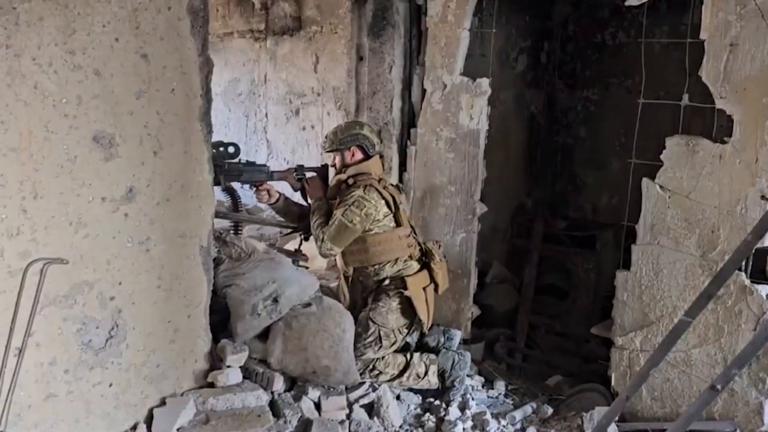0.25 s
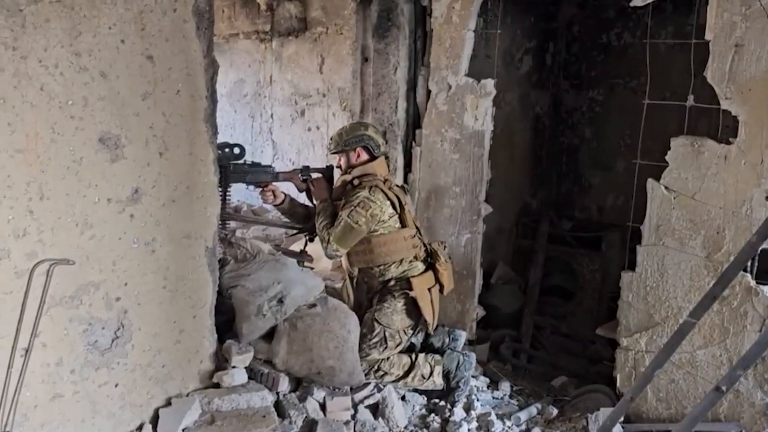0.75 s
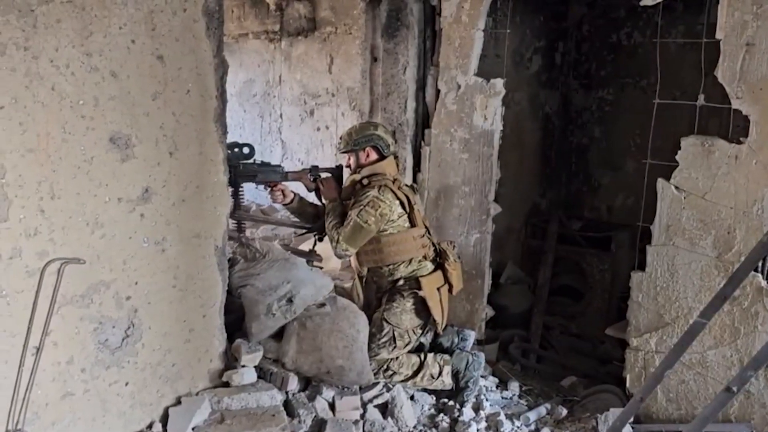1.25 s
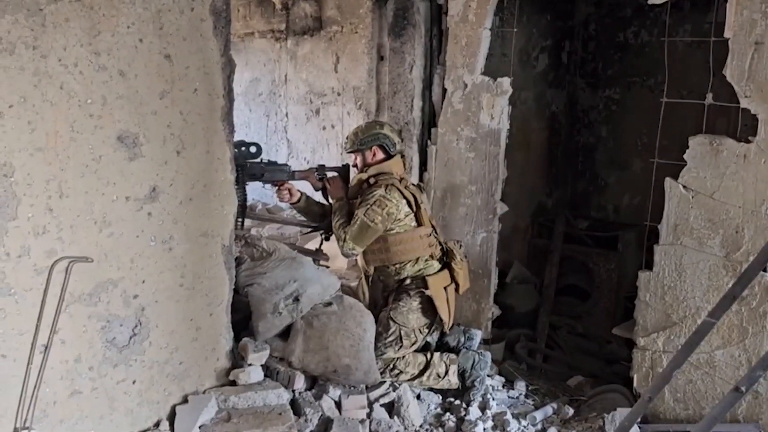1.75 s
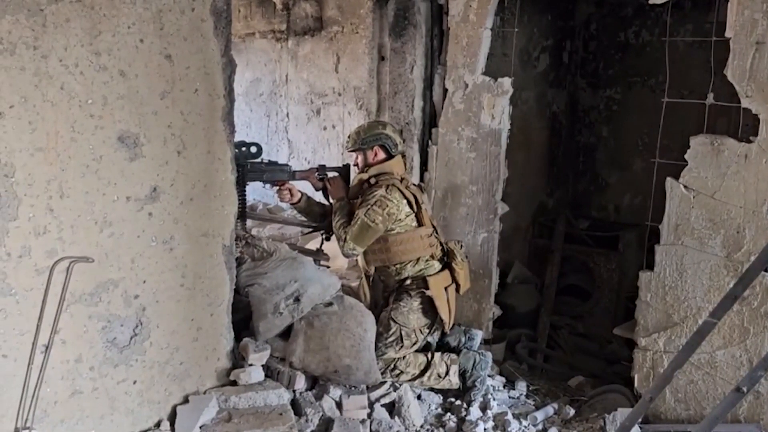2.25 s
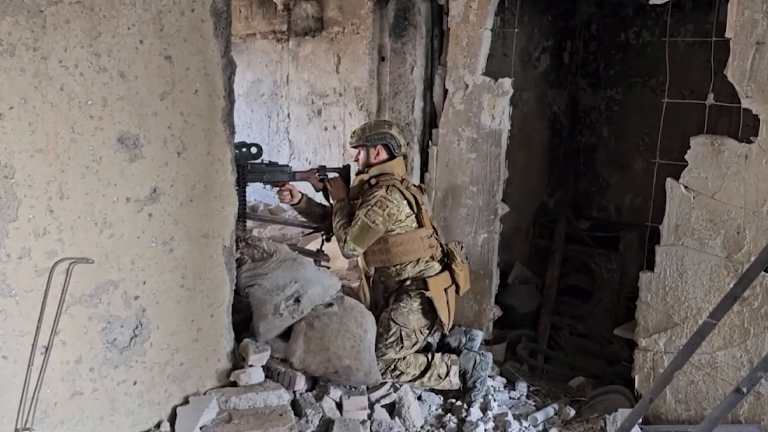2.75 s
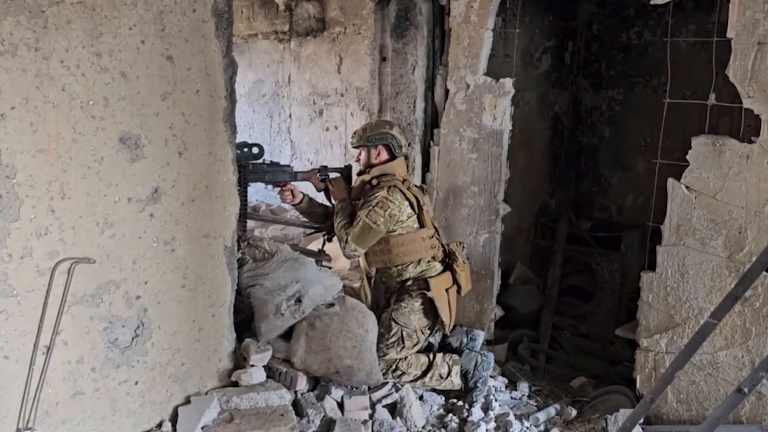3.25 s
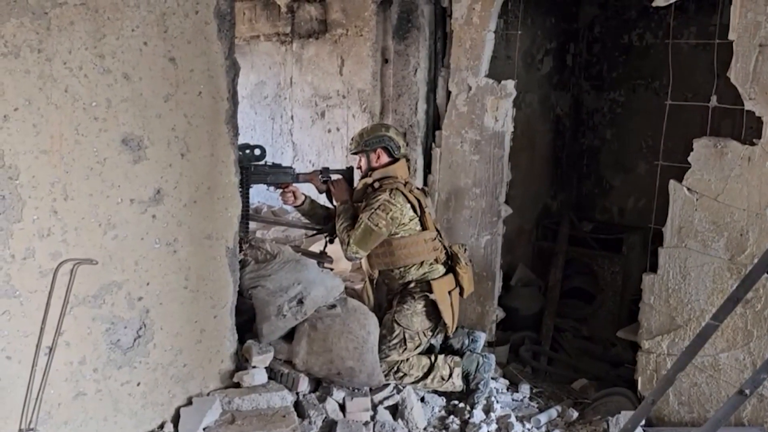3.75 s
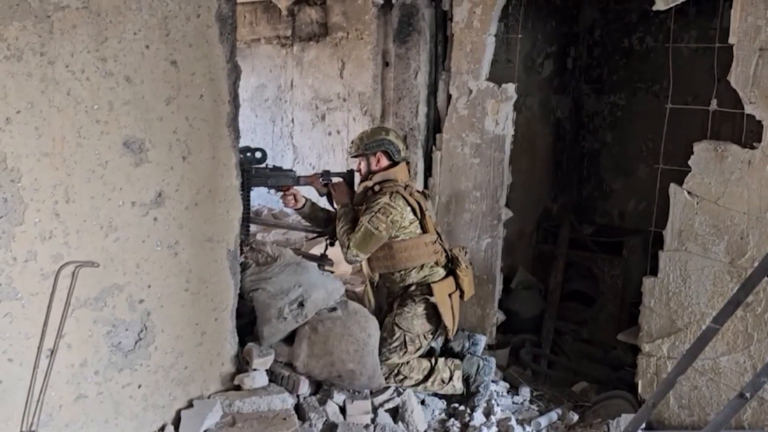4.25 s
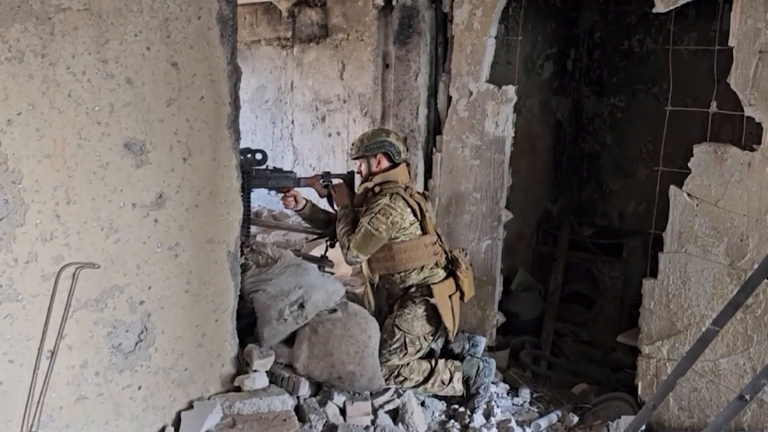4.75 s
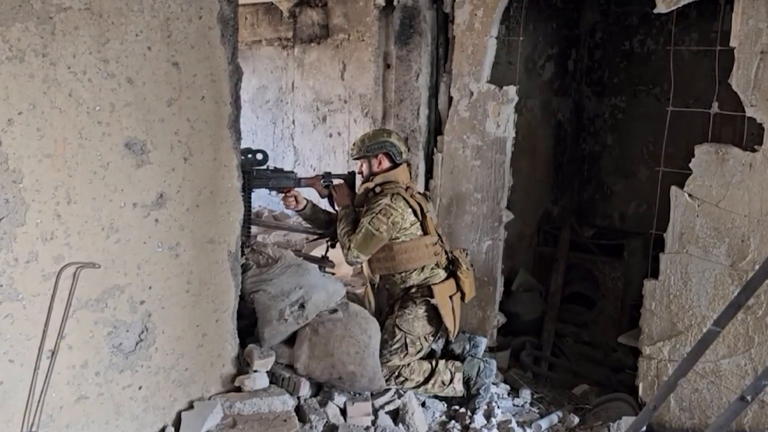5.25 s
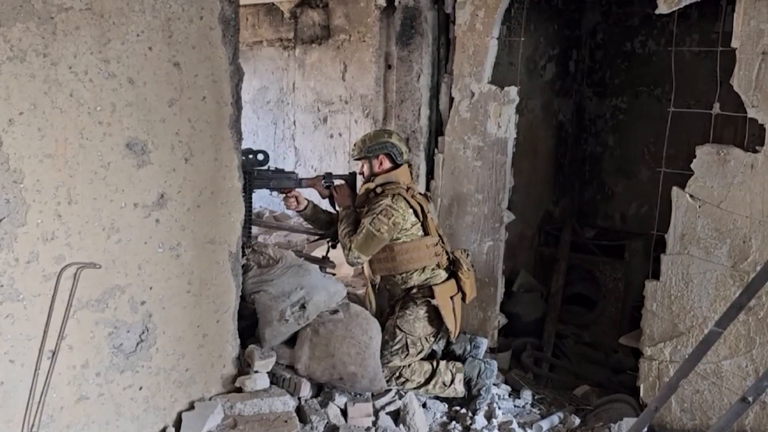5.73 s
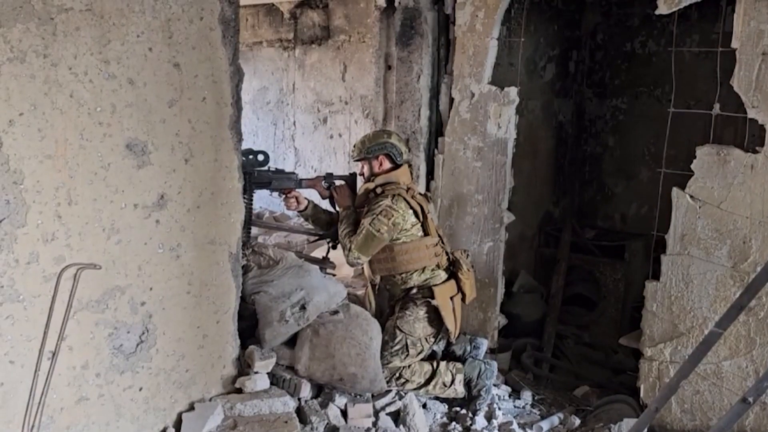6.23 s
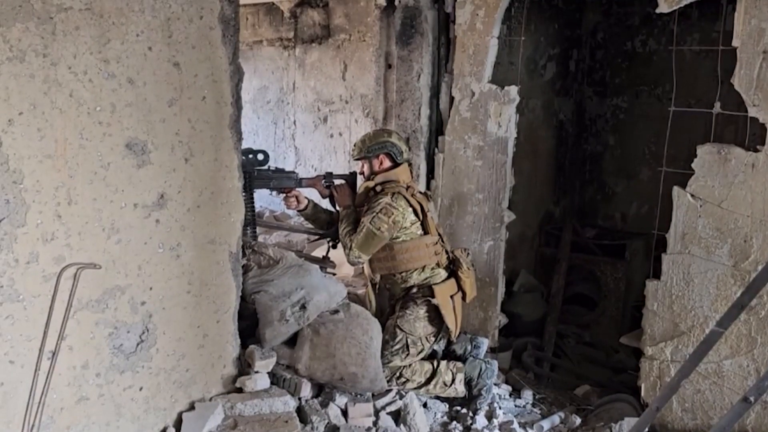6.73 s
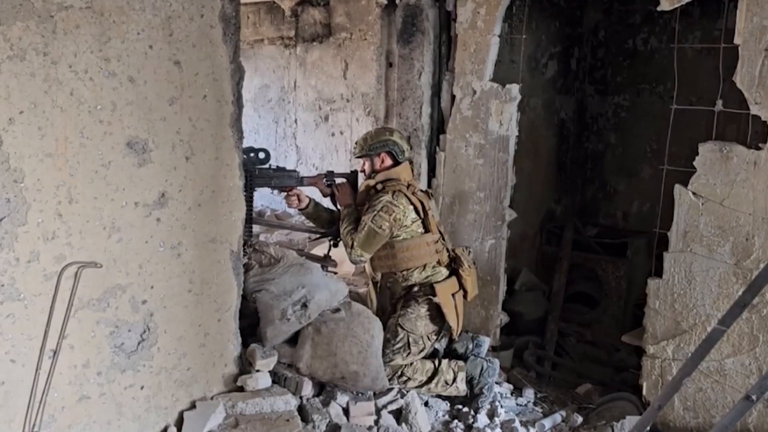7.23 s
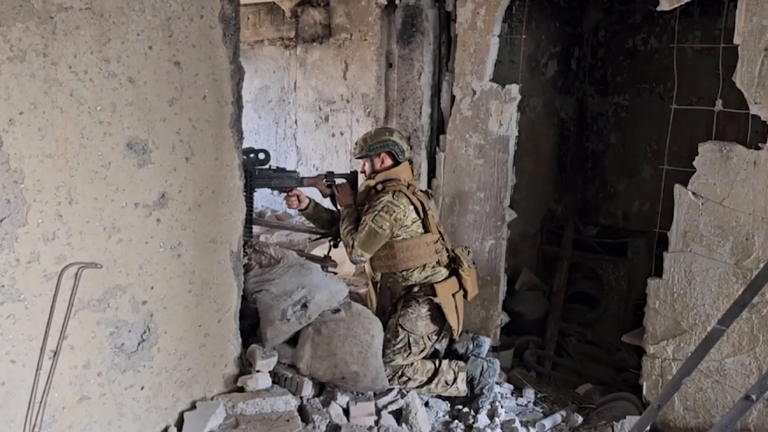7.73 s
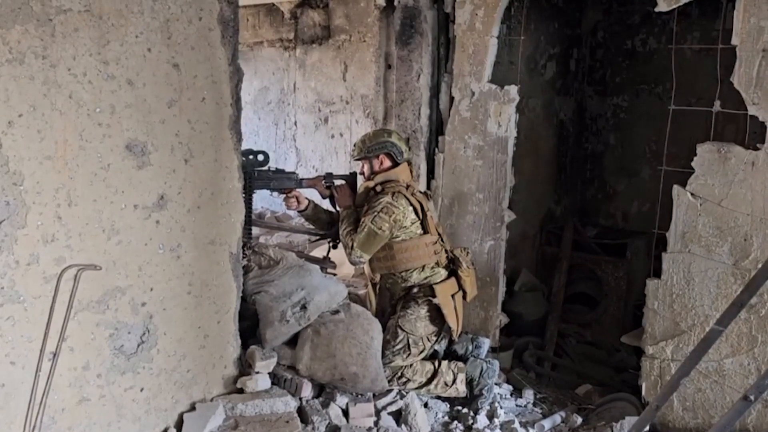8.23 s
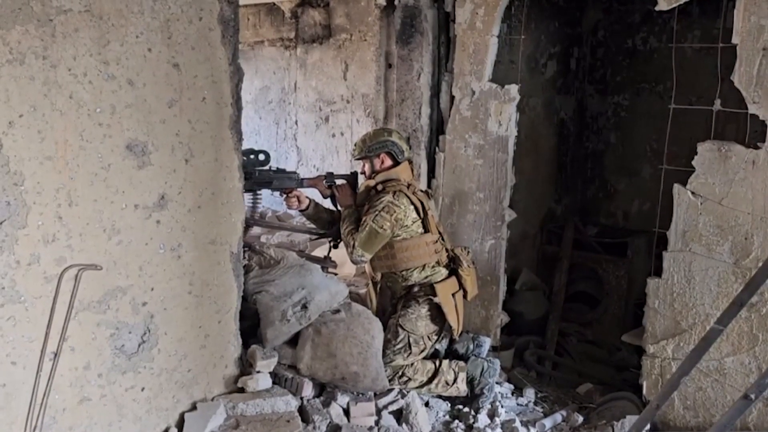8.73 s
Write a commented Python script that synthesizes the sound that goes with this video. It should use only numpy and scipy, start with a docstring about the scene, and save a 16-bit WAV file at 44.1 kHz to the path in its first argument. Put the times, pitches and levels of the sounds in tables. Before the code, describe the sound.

Close, overloaded gunfire in a ruined concrete room over faint low air noise. At 0.2 s a bolt scrapes forward and a machine gun fires five rounds until 0.6 s, the opening shot loudest. Sharp wall slaps and rumble follow; a case tinkles near 1.0 s. A ten-round burst runs from 1.2 to 2.0 s, ending in a low boom, with brass ticking on stone at 2.1-2.4 s. Distant cracks return around 3-5 s as the outdoor rumble fades; grit rustles at 3.4 s and a dull knock comes at 3.7 s. The bolt slides at 6.05 s, then eight rounds fire from 6.1 to 6.7 s. A faint low tone lingers from 7 s while cases and a belt link clink until 7.8 s. A soft thud sounds at 8.1 s, the bolt slides at 8.55 s, and five rounds fire from 8.6 to 9.0 s.

```python
"""Machine gun in a ruin

A machine gun fires four bursts inside a ruined building. Noise shaped by pitch makes the room's roar.
Low notes ring after each round; short falling tones come back from walls and slopes as sharp echoes.
Fading noise makes the rumble outdoors and the sliding bolt. Spent cases tick and ring on the rubble.
"""
import sys
import numpy as np
from scipy import signal
from scipy.fft import rfft, irfft
from scipy.io import wavfile
from scipy.ndimage import uniform_filter1d

SR = 44100
rng = np.random.default_rng(int(sys.argv[2]) if len(sys.argv) > 2 else 0)


def store_wav(level_fs):
    """Save 16-bit WAV to argv[1]."""
    pcm = np.round(np.clip(np.atleast_2d(level_fs), -1, 1) * 32767)
    wavfile.write(sys.argv[1], SR, pcm.T.astype(np.int16))


N = 396459  # length in samples


def gain_of(db):
    """Turn decibels into a factor for the wave."""
    return 10 ** (np.asarray(db) / 20)


def flat(db):
    """The same level at every pitch."""
    return lambda hz: db


def read(points, hz):
    """Read a table between its points, with pitch on a log scale."""
    f, value = np.transpose(points)
    return np.interp(np.log(hz + 1), np.log(f + 1), value)


def add(mix, s, sound):
    """Lay a sound into the mix at s seconds."""
    part = mix[:, round(s * SR):][:, :sound.shape[-1]]
    part += sound[..., :part.shape[1]]


def placed(sound, lead_ms, pan_db):
    """Two microphone ports hear one sound a little apart in time and level."""
    hz = np.fft.rfftfreq(len(sound), 1 / SR)
    side = np.array([[.5], [-.5]])
    shift = np.exp(2j * np.pi * hz * lead_ms / 1000 * side)
    return irfft(rfft(sound) * shift, len(sound)) * gain_of(pan_db * side)


# how alike left and right are: (f/Hz, likeness from 0 to 1)
LIKENESS = [(60, 1), (250, 0.14), (600, 0.94), (1200, 0.31), (2500, 0.057), (12000, 0.03)]


def diffuse(times, level_db, spectrum, t60, rise_s, lead_ms, pan_db, size):
    """Reverberant noise: each event feeds every band, which swells, then dies at its own speed."""
    hop, hz = size // 4, np.fft.rfftfreq(size, 1 / SR)
    frames = N // hop + 5
    shape = gain_of(read(spectrum, hz)) ** 2
    feed = np.zeros((len(hz), frames))
    for s, db in zip(times, level_db):
        if s * SR < N:
            feed[:, int(np.ceil(s * SR / hop))] += shape / shape.sum() * gain_of(2 * db(hz))
    # 120 dB here is 60 dB of sound level, because power is being faded
    fall = gain_of(-120 * hop / SR / read(t60, hz))
    swell = np.exp(-hop / SR / rise_s)
    power = np.array([signal.lfilter([1], [1, -r], row) for r, row in zip(fall, feed)])
    power = signal.lfilter([1 - swell], [1, -swell], power)
    a, b, c, d, lumps = rng.standard_normal((frames, len(hz), 5), dtype=np.float32).T
    # random patches of pitch and time are louder or softer
    lumps = uniform_filter1d(uniform_filter1d(lumps, size=3, axis=0), size=12, axis=1)
    power *= gain_of(2 * 2.1 * lumps / lumps.std())
    same = np.clip(read(LIKENESS, hz), 0, 1)[:, None]
    left = a + 1j * b
    late = np.exp(-2j * np.pi * hz * lead_ms / 1000)[:, None]
    right = same * left * late + np.sqrt(1 - same ** 2) * (c + 1j * d)
    bands = np.array([left, right]) * np.sqrt(power)
    sound = signal.istft(bands, nperseg=size, noverlap=size - hop)[1][:, :N]
    return sound * gain_of([[pan_db / 2], [-pan_db / 2]]) / 2


# colour of the background air: (f/Hz, relative level/dB per Hz)
AIR_COLOUR = [(30, -22), (69, -19.5), (107, 1.5), (148, -33), (238, -16), (3500, -43), (4550, -78),
              (7700, -120)]
AIR_DB = -65.5


def air():
    """Steady, mostly low noise; its fade is so slow that it cannot be heard."""
    still = [(100, 1e4), (1000, 1e4)]
    return diffuse([0], [flat(AIR_DB)], AIR_COLOUR, still, 1e-4, 0, 1.1, size=1024)


HUM_S, HUM_HZ, HUM_DB = 6.96, 217, -45.5
HUM_RISE_S, HUM_T60_S = 0.045, 3.7


def hum():
    """A low tone hangs on after the third burst, its pitch wavering a little."""
    t = np.maximum(np.arange(N) / SR - HUM_S, 0)
    waver_hz = uniform_filter1d(rng.standard_normal(N), 4000) * 150
    level = np.minimum(t / HUM_RISE_S, 1) ** 2 * gain_of(HUM_DB - 60 * t / HUM_T60_S)
    return level * np.sin(2 * np.pi * np.cumsum(HUM_HZ + waver_hz) / SR)


# extra tones in a returning crack: (multiple of its pitch, level/dB)
CRACK_OVERTONES = [(2, -16), (3, -28)]
SMEAR_DB, SMEAR_S = -36, .025  # rough ground drags each echo out
SCATTER_DB, SCATTER_S = -19.5, 0.054  # rubble scatters the bright edge


def returning_crack(hz, tune, ms, edge_db, again_ms, noise):
    """A crack comes back as a few falling cycles, smeared, repeated and edged with noise."""
    t = np.arange(-128, 1920) / SR
    turns = hz * (1 + .03 * tune) * t * (1 - 110 * t)
    slap = np.sin(2 * np.pi * turns)
    slap += sum(gain_of(a) * np.sin(2 * np.pi * k * turns) for k, a in CRACK_OVERTONES)
    slap *= np.exp(-(t * 1000 / ms) ** 2)
    tail = noise * np.exp(-(t - t[0]) / SMEAR_S)
    slap += gain_of(SMEAR_DB) * signal.fftconvolve(slap, tail)[:len(t)]
    slap += gain_of(-15) * np.roll(slap, round(again_ms * SR / 1000))
    edge = np.exp(-(t * 1000 / ms / 2) ** 2)
    edge += gain_of(SCATTER_DB) * (t > 0) * np.exp(-t / SCATTER_S)
    return slap + gain_of(edge_db) * noise * edge  # near walls keep the bright edge


# walls and slopes that reflect: (delay t/s, base level/dB, centre f/Hz, length/ms,
# bright edge level/dB, second return after t/ms, left-right level/dB)
REFLECTORS = [(.319, -15, 2200, .35, -7, 7, 2), (.3455, -16, 2000, .45, -20, 7, 2),
              (2.753, -32.5, 1450, .9, -60, 15.5, 4)]
# colour of the rumble outside: (f/Hz, relative level/dB per Hz)
LAND_COLOUR = [(30, 4), (86, -8.5), (166, -23), (217, -10), (802, -14.5), (1100, -20.5), (2200, -18.5),
               (3600, -24), (6000, -35), (8450, -70.5), (14300, -120)]
# how long the rumble takes to fall 60 dB: (f/Hz, t/s)
LAND_FADE = [(60, 3.2), (250, 4.4), (2000, 3.6), (4000, 2.6), (8000, 1.6)]
# colour of the murmur behind the far echo: (f/Hz, relative level/dB per Hz)
RIDGE_COLOUR = [(59, -52), (100, -8), (768, -4.5), (1580, -1.5), (3020, -17), (6000, -31), (7800, -76),
                (13200, -120)]
OPENING_SHIFT_S = .004  # an opening round's echo is timed from slightly after its listed start


def outdoors():
    """Every round has the same charge: sharp echoes, a long rumble, and a murmur from the far slope."""
    times = np.transpose(GUN_ROUNDS)[0]
    out, slope = np.zeros((2, N)), np.zeros((2, N))
    shift = OPENING_SHIFT_S * (np.diff(times, prepend=-np.inf) > PAUSE_S)
    for delay, db, hz, ms, edge_db, again_ms, pan_db in REFLECTORS:
        for s, luck in zip(times + shift, rng.standard_normal((len(times), 2050))):
            spread, tune = luck[:2]
            slap = returning_crack(hz, tune, ms, edge_db, again_ms, luck[2:])
            echo = gain_of(db + .8 * spread) * placed(slap, -.4, pan_db)
            add(slope if delay > 1 else out, s + delay - 128 / SR, echo)
    rumble_db, murmur_db = [flat(-28)] * len(times), [flat(-59.5)] * len(times)
    out += diffuse(times, rumble_db, LAND_COLOUR, LAND_FADE, 0.11, -0.35, 1.5, size=1024)
    far_times, far_fade = times + REFLECTORS[2][0], [(300, 2.9), (3000, 2.76)]
    out += diffuse(far_times, murmur_db, RIDGE_COLOUR, far_fade, 0.0063, -0.25, 2.2, size=1024)
    return out, slope


SLOPE_LINGER = 1.5  # the far slope's echoes feel the slow cut more


def held_down(far, slope, near):
    """Gain control: loud gunfire turns distant sound down; part of the cut lets go only slowly."""
    # taking differences between samples makes the treble count more
    power = uniform_filter1d(np.diff(near, prepend=0)[0] ** 2, 2000)
    power_db = 10 * np.log10(abs(power) + 1e-12)
    over_db = np.maximum(power_db + 56.5, 0)
    keep = np.exp(-1 / (.9 * SR))  # 0.9 s memory
    lingering_db = signal.lfilter([1 - keep], [1, -keep], over_db)
    distant = far + slope / gain_of(SLOPE_LINGER * lingering_db)
    return distant / gain_of(0.98 * over_db + 0.69 * lingering_db)


# dull knocks near the microphone: (t/s, strength level/dB, f/Hz)
DULL_KNOCKS = [(3.711, -27, 124), (8.143, -30.5, 94)]


def thuds():
    """A soft push: a low tone that dies too fast to ring."""
    t, out = np.arange(2048) / SR, np.zeros((2, N))
    for s, db, hz in DULL_KNOCKS:
        add(out, s, gain_of(db - 60 * t / 0.0045) * np.sin(2 * np.pi * hz * t))
    return out


# bits of rubble that drop without a ring: (t/s, base level/dB)
RUBBLE_CHIPS = [(3.448, -53), (7.805, -65), (8.137, -73)]
CHIP_HZ, CHIP_T60_S = (3500, 8050), 0.069


def chips():
    """A short dry rustle of grit: a band of noise that dies quickly."""
    t, out = np.arange(4096) / SR, np.zeros((2, N))
    band = signal.butter(2, CHIP_HZ, "band", fs=SR, output="sos")
    for (s, db), luck in zip(RUBBLE_CHIPS, rng.standard_normal((len(RUBBLE_CHIPS), len(t)))):
        grit = signal.sosfilt(band, luck)
        level = gain_of(db - 60 * t / CHIP_T60_S) * np.minimum(t / 0.0015, 1)
        add(out, s, placed(level * grit, 0.137, 8.1))
    return out


LINK_S, LINK_HZ, LINK_DB, LINK_T60_S = 7.511, 4600, -48, .08


def link():
    """A belt link clinks: one short fading tone of steel."""
    t, out = np.arange(4096) / SR, np.zeros((2, N))
    clink = gain_of(LINK_DB - 60 * t / LINK_T60_S) * np.sin(2 * np.pi * LINK_HZ * t)
    add(out, LINK_S, placed(clink, 0.28, 4.4))
    return out


# spent cases land: (t/s, base level/dB)
CASE_LANDINGS = [(0.9773, -37), (2.137, -30), (2.2422, -40.5), (2.405, -50), (7.14, -56.5), (7.215, -35.5),
                 (7.327, -50), (7.383, -43), (7.4939, -49), (7.5602, -45), (7.77, -59.5)]
# ringing tones of a case: (base f/Hz, relative level/dB, time to fall 60 dB t/s)
BRASS_TONES = [(9920, -5, .2), (10230, -5, .14), (13560, -2, .15), (15000, -10, .12)]
RING_DB, TICK_DB, GRIT_DB = -13, -11, -25  # brass, stone and grit against the landing's base level
GRIT_T60_S, CASE_SPREAD = .2, .022  # cases differ a little in pitch


def cases():
    """A dry tick on stone, rattling grit and ringing brass; each case skips on twice, more softly."""
    t, out = np.arange(6144) / SR, np.zeros((2, N))
    draws = rng.standard_normal((len(CASE_LANDINGS), 3, len(BRASS_TONES) + 3 + len(t)))
    for (s, db), luck in zip(CASE_LANDINGS, draws):
        tune = 1 + CASE_SPREAD * luck[0, 2]
        for skip, draw in enumerate(luck):
            gap, pan = draw[:2]
            ring = np.zeros(len(t))
            for (hz, a, t60), uneven in zip(BRASS_TONES, draw[3:]):
                level = gain_of(a + RING_DB + 1.8 * uneven - 60 * t / t60)
                ring += level * np.sin(2 * np.pi * hz * tune * t)
            scrape = gain_of(TICK_DB - 7.4 * skip - 60 * t / 0.025)
            scrape += gain_of(GRIT_DB - 60 * t / GRIT_T60_S)
            tick = scrape * np.diff(draw[-len(t):], prepend=0)
            landing = np.roll(ring + tick, 20)
            add(out, s, gain_of(db) * placed(landing, 0.138, 6.5 + 4.3 * pan))
            s, db = s + 0.022 * (1 + abs(gap)), db - 9.0
    return out


# the bolt runs forward before a burst: (t/s, slide level/dB,
# base level/dB of the lower swell as it rams the round home)
BOLT_RUNS = [(0.18, -13.5, -3), (1.122, -33, -43), (6.046, -19.5, -14), (8.555, -23.5, -13)]
# colour of the sliding bolt: (f/Hz, relative level/dB per Hz)
SLIDE_COLOUR = [(120, -52.5), (200, -24), (997, -10.5), (4620, -10.5), (15000, -23.5)]
# the ram against the slide: (f/Hz, level/dB)
RAM_COLOUR = [(250, 6.5), (700, 12.5), (1500, -13.5), (3000, -39)]
RAM_S, SLIDE_STOP_S = 0.041, 0.069  # ram's delay after the slide; fade of both once the gun fires


def bolt():
    """Steel slides on steel and a lower swell grows, until the first round goes off."""
    times, slide, ram = np.transpose(BOLT_RUNS)
    t, shots = np.arange(N) / SR, np.transpose(GUN_ROUNDS)[0]
    fired = shots[np.searchsorted(shots, times)]
    since = t - fired[np.maximum(np.searchsorted(times, t) - 1, 0)]
    colours = [flat(db) for db in slide]
    colours += [lambda hz, db=db: db + read(RAM_COLOUR, hz) for db in ram]
    starts, fade = [*times, *(times + RAM_S)], [(500, 0.91), (8000, 1.0)]
    out = diffuse(starts, colours, SLIDE_COLOUR, fade, 0.058, 0.53, 1.0, size=256)
    return out * np.exp(-np.maximum(since, 0) / SLIDE_STOP_S)


def blast(ms):
    """Muzzle blast round a corner: a rounded pressure step that swings through into suction."""
    u = np.maximum(np.arange(-40, 2008) / SR * 1000 / ms, 0)
    return (1 - u) * np.exp(-u) * (1 - np.exp(-3.5 * u)) * 2


def push(ms):
    """A dull swing from suction into pressure, centred 400 samples in."""
    u = np.arange(-400, 624) / SR * 1000 / ms
    return 2 * u * np.exp(-u ** 2)


def swing(hz, glide, swell_s, fade_s, turn):
    """A low note that swells and fades; its pitch can glide."""
    t = np.arange(8192) / SR
    turns = hz * t + glide * t * np.minimum(t, .06) / 2 + turn
    return np.sin(2 * np.pi * turns) * (t / swell_s) * np.exp(1 - t / fade_s)


SAG_HZ, SAG_DB = (965, 1900), -7  # this band sags early in a burst
SAG_FROM_S, SAG_TO_S, SAG_S_PER_DB = .09, .38, .035  # after the opening round; longer when it was loud


def sagged(x, openings, roar_db):
    """Lowers one band of the roar for a while after each opening round."""
    t = np.arange(N) / SR
    on = np.zeros(N)
    for s, db in zip(openings, roar_db):
        on += (t > s + SAG_FROM_S) & (t < s + SAG_TO_S + SAG_S_PER_DB * db)
    sos = signal.butter(3, SAG_HZ, "band", fs=SR, output="sos")
    band = signal.sosfiltfilt(sos, x)
    return x - (1 - gain_of(SAG_DB)) * uniform_filter1d(on, size=400) * band


# colour of the roar: (f/Hz, relative level/dB per Hz)
ROAR_COLOUR = [(88, -34), (150, -26.5), (281, -2), (323, -18.5), (682, -9.5), (1500, -18), (2400, -22.5),
               (10500, -31), (15000, -32.5)]
# how long the roar takes to fall 60 dB: (f/Hz, t/s)
ROOM_FADE = [(300, 1), (1000, 0.46), (3000, 0.46), (12000, 0.31)]
# colour of the far walls' answer: (f/Hz, relative level/dB per Hz)
ANSWER_COLOUR = [(120, -20.5), (220, 3.5), (400, -1.5), (700, -1.5), (1400, -8.5), (3000, -57.5)]
# colour of the low room modes: (f/Hz, relative level/dB per Hz)
BOOM_COLOUR = [(21, -39.5), (35, -9), (65, -1), (119, -7), (179, -14.5), (219, -12.5), (400, -20),
               (520, -47), (880, -120)]
# how long the boom takes to fall 60 dB: (f/Hz, t/s)
BOOM_FADE = [(40, 0.83), (70, 0.5), (120, 0.42), (300, 0.94)]
ROAR_RISE_S, HOLLOW_DB = .007, 0.5  # base level of the roar below about 2 kHz
ANSWER_DB, FIRST_ANSWER_DB, LAST_ANSWER_DB = -16.5, -17, -9  # base levels, before each round's low end
ANSWER_DIP = 0.34  # share of the dip
BOOM_DB, LAST_BOOM_DB = -23, -9.5  # base levels; let out in full only after a burst's last round


def room(times, roar, dip, weight, first, last):
    """Roar at once, a later swell from the room's far walls, and a slow boom: all fading noise."""
    colours = []
    for db, hollow in zip(roar, HOLLOW_DB + dip + weight):
        tilt = [(600, hollow), (1750, 0.38 * hollow - 3), (2200, 0.0015)]
        colours.append(lambda hz, db=db, tilt=tilt: db + read(tilt, hz))
    out = diffuse(times, colours, ROAR_COLOUR, ROOM_FADE, ROAR_RISE_S, .4, 1.4, size=256)
    later_db = np.where(last, LAST_ANSWER_DB, ANSWER_DB + ANSWER_DIP * dip)
    answer = [flat(db) for db in np.where(first, FIRST_ANSWER_DB, later_db) + weight]
    answer_fade = [(200, .2), (1000, .15)]
    out += diffuse(times + .034, answer, ANSWER_COLOUR, answer_fade, .011, .3, 1.1, size=512)
    boom = [flat(db) for db in np.where(last, LAST_BOOM_DB, BOOM_DB) + weight]
    out += diffuse(times, boom, BOOM_COLOUR, BOOM_FADE, .07, .4, -.3, size=1024)
    return sagged(out, times[first], roar[first])


# one row a round: (t/s, roar base level/dB, weight of the low end level/dB)
GUN_ROUNDS = [(0.249, -1, -12.5), (0.341, -4, 2.5), (0.424, -7.5, -0.5), (0.511, -7.5, -6), (0.6, -8.5, -4),
              (1.192, -5.5, -1), (1.286, -12.5, -20), (1.369, -14, -3.5), (1.452, -14.5, 0.5),
              (1.538, -15.5, -4.5), (1.627, -14, -1.5), (1.715, -15, -9.5), (1.796, -16, -6),
              (1.879, -16, -7), (1.966, -14.5, -8.5), (6.108, -2, -9), (6.206, -7, 0), (6.296, -9, -5),
              (6.375, -10, -7), (6.458, -10.5, -1.5), (6.541, -11.5, 0), (6.63, -11, 0.5),
              (6.715, -12.5, -11), (8.620, -5, -3), (8.72, -11.5, -16), (8.808, -14, -1),
              (8.886, -14.5, -2), (8.971, -15, -4)]
# low rings of the room after every round: (delay t/s, base start f/Hz, glide in Hz per s, swell t/s,
# fade t/s, base level/dB, dB for each dB of roar, share of the dip, share of the weight)
ROOM_RINGS = [(.05, 255.8, 899, 0.0064, 0.0072, -12, 0.53, 0.011, 0.15),
              (0.049, 92, -12, 0.0403, 0.017, -19.5, -0.64, 0.44, 1)]
# the room sinks to its lowest notes once a burst stops: (delay t/s, f/Hz, swell t/s, level/dB)
SINKING_NOTES = [(0.071, 83.3, 0.019, -24), (0.191, 62.2, 0.031, -26.5), (.33, 70.5, .025, -32.5)]
# the blast comes back dulled from far walls: (delay t/s, half width/ms, sign, base level/dB)
BLAST_RETURNS = [(.098, 1.6, -1, -15.5), (.139, 3.1, 1, -15)]
RETURN_CUT_DB = -11.5  # weaker while the gun still fires
PAUSE_S = .3  # a longer silence ends a burst
DIP_DB, DIP_KEPT = -29.5, 0.42  # low end dips most on the second round; share kept round by round
BLAST_DB, FIRST_BLAST_DB, BLAST_DIP = -8.5, -9, .15  # later rounds (base), opening, share of the dip
THUMP_HZ, THUMP_SWELL_S, THUMP_DB = 245, .006, -15  # opening thump, against the roar


def gun():
    """Each round: a blast and the room's noise, then low rings, dull returns and sinking notes."""
    times, roar, weight = np.transpose(GUN_ROUNDS)
    first = np.diff(times, prepend=-np.inf) > PAUSE_S
    # the very last round counts as still firing: no pause follows it here
    last = np.diff(times, append=times[-1]) > PAUSE_S
    count = np.arange(len(times))
    place = count - np.maximum.accumulate(count * first)  # place in its burst, from 0
    dip = np.where(first, 0, DIP_DB * np.clip(DIP_KEPT, 0, 1) ** np.maximum(place - 1, 0))
    out = room(times, roar, dip, weight, first, last)
    luck = rng.random((len(times), 3))
    for s, db, low, heavy, opens, ends, (u, v, w) in zip(times, roar, dip, weight, first, last, luck):
        lean_db = BLAST_DIP * low + heavy
        blast_db = FIRST_BLAST_DB if opens else BLAST_DB + lean_db
        add(out, s - .002, gain_of(blast_db) * placed(-blast(1.1), .4, 1.1))
        for delay, hz, glide, swell_s, fade_s, ring_db, follow, share, lean in ROOM_RINGS:
            ring = swing(hz * (1 + 0.16 * (u - .5)), glide, swell_s, fade_s, v)
            level_db = ring_db + follow * db + share * low + lean * heavy + 3.1 * (w - 2.0)
            add(out, s + delay, gain_of(level_db) * placed(ring, 0.14, 1.4))
        if opens:
            thump = swing(THUMP_HZ, 0, THUMP_SWELL_S, THUMP_SWELL_S, v)
            add(out, s - THUMP_SWELL_S, gain_of(THUMP_DB + db) * placed(thump, 0.29, 1.1))
        for delay, hz, swell_s, sink_db in SINKING_NOTES if ends else []:
            note = swing(hz, 0, swell_s, swell_s, 0)
            add(out, s + delay, gain_of(sink_db) * placed(note, 0.042, .1))
        for delay, ms, sign, back_db in BLAST_RETURNS:
            level_db = back_db + (0 if ends else RETURN_CUT_DB + lean_db)
            add(out, s + delay - 400 / SR, sign * gain_of(level_db) * placed(push(ms), 0.19, 0.45))
    return out


def scene():
    """Gun and bolt are near; their loudness holds the outdoors down, and the small sounds join in."""
    background = air()
    near = gun() + bolt()
    far = held_down(*outdoors(), near)
    return near + far + cases() + link() + chips() + thuds() + hum() + background


EDGE_HZ = 16100  # upper band limit


def record(dry):
    """The microphone loses the deepest bass and overloads softly; then the band limit."""
    thin = signal.sosfilt(signal.butter(3, 50, "high", fs=SR, output="sos"), dry)
    loud = 1.546 * np.tanh(thin / 0.8)
    lowpass = signal.firwin(511, EDGE_HZ, window=("kaiser", 9), fs=SR)
    return signal.oaconvolve(loud, lowpass[None], "same")


dry = scene()
out = record(dry)
store_wav(out)
```